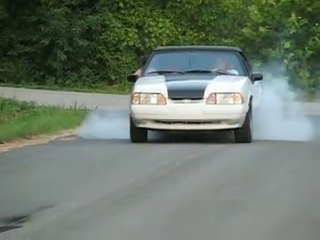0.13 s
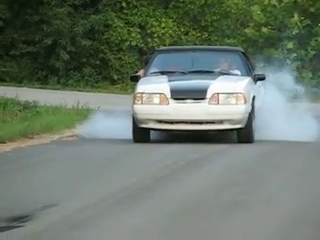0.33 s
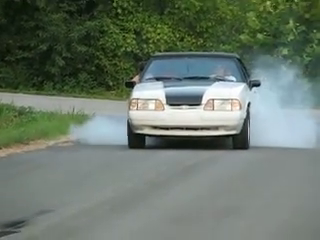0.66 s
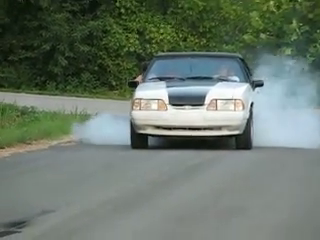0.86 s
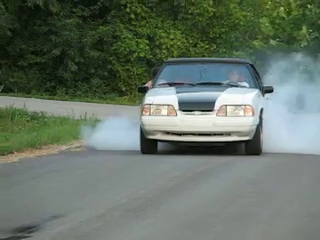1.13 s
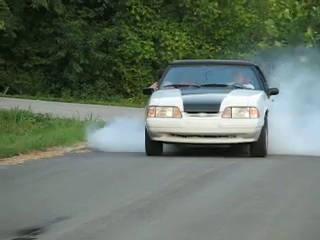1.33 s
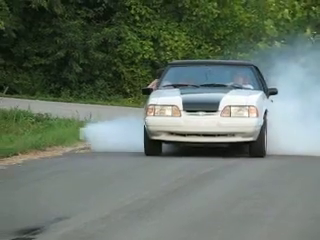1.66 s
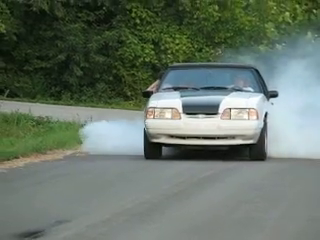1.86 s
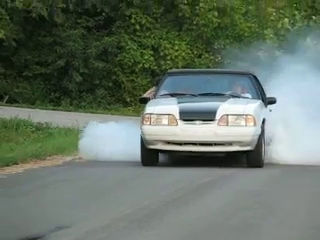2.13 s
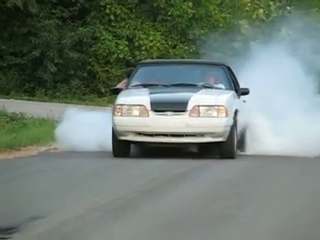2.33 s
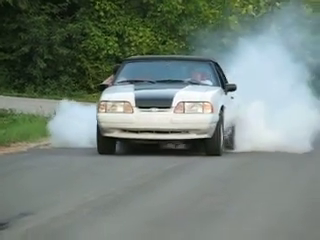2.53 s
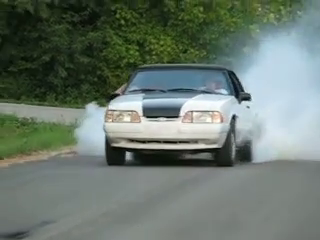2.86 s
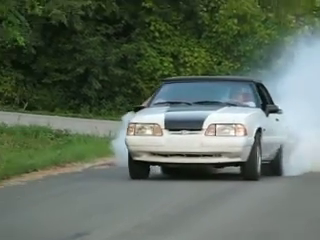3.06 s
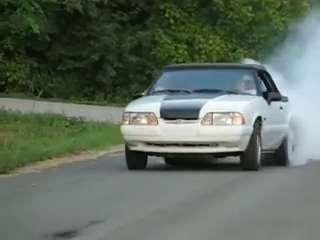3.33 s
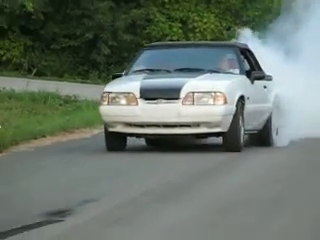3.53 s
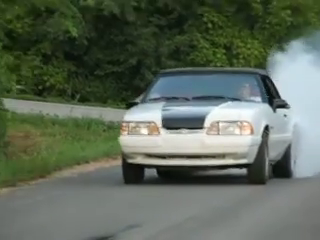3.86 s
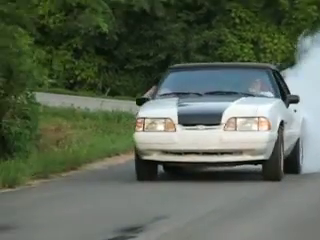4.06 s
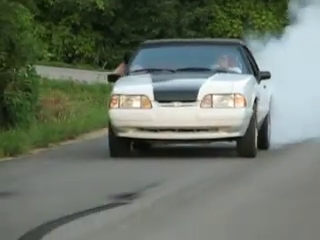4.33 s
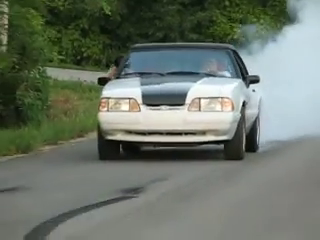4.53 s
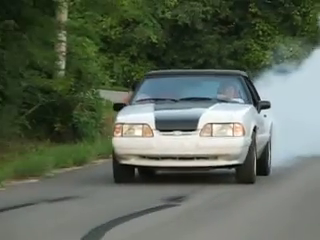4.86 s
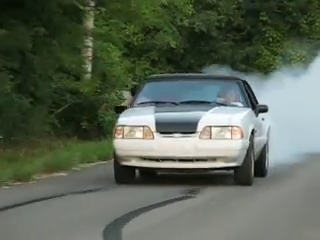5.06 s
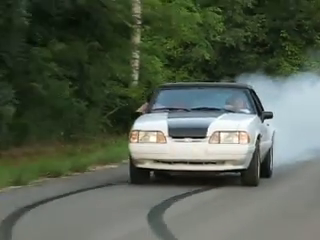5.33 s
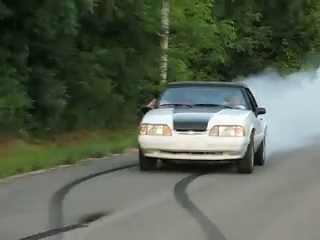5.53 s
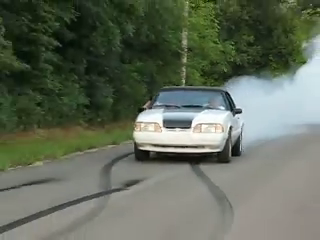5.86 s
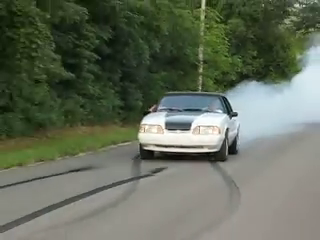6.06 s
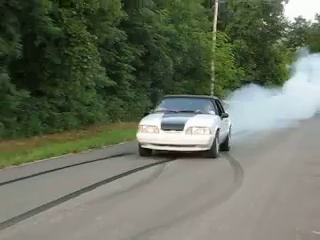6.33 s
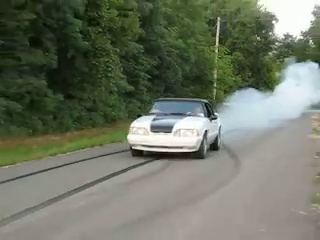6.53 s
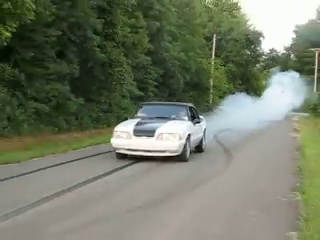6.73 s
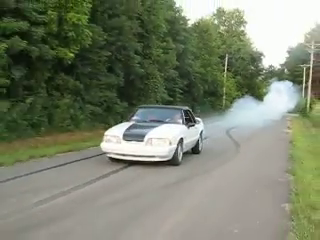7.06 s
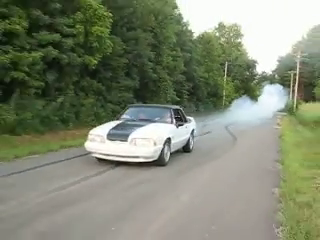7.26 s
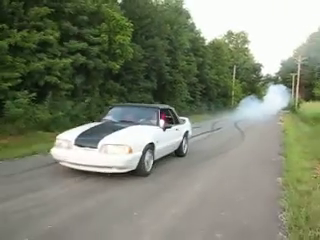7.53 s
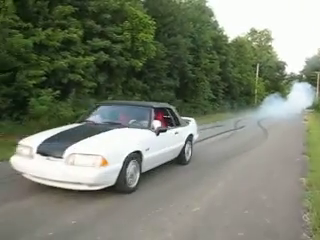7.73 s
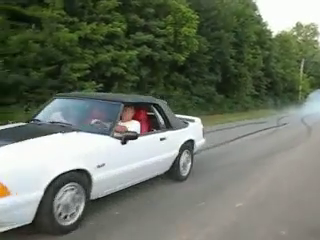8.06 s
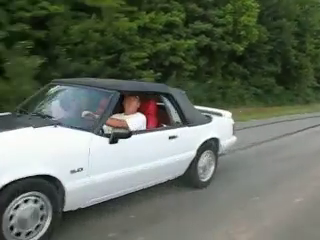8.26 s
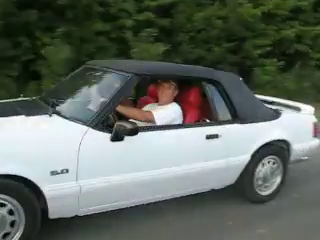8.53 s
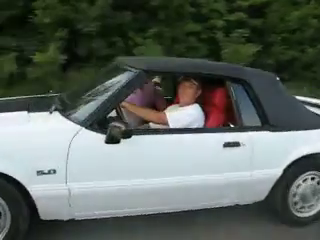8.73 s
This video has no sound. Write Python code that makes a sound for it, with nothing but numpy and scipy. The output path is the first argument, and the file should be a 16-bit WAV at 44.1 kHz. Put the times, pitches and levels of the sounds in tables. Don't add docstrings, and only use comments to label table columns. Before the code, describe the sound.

A V8 engine roars and whines over hissing, spinning tyres, rubber squeals as it grips, then exhaust booms and pops as the car coasts past.

```python
import sys
import numpy as np
from scipy import signal
from scipy.fft import rfft, irfft
from scipy.io import wavfile
from scipy.ndimage import uniform_filter1d

SR = 44100
rng = np.random.default_rng(int(sys.argv[2]) if len(sys.argv) > 2 else 0)


def store_wav(level_fs):
    pcm = np.round(np.clip(np.atleast_2d(level_fs), -1, 1) * 32767)
    wavfile.write(sys.argv[1], SR, pcm.T.astype(np.int16))


def volts(x):
    e = np.asarray(x, float) / 20
    return 10 ** e


N = 392490
COARSE = 8
REVS_HZ = 250
DUCT_HZ, DUCT_WIDTH_HZ = 168.7, 27


def rms_one(x):
    return x / np.sqrt(np.mean(np.abs(x) ** 2) + 1e-20)


def in_time(rows):
    s, *columns = np.transpose(rows)
    return [np.interp(np.arange(N) / SR, s, column) for column in columns]


def curve(rows):
    return in_time(rows)[0]


def at_hz(points, hz):
    table = np.array(points)
    return np.interp(np.log(hz), np.log(table[:, 0]), table[:, 1])


def drift(rate, at=None):
    r = np.exp(-80 * np.pi * rate / SR)
    chance = rng.standard_normal(N // 40 + 2002)
    slow = signal.lfilter([1], [1, -2 * r, r * r], chance)[2000:]
    at = np.arange(N) if at is None else at
    return np.interp(at / 40, np.arange(len(slow)), rms_one(slow))


def peak(hz, center_hz, width_hz):
    return 1 / (1 + ((hz - center_hz) / width_hz) ** 2)


def tone(cycles, order, wobble_db, slack):
    at = np.linspace(0, N, len(cycles))
    level = np.sqrt(2) * volts(wobble_db * drift(3.24, at))
    phase = 2 * np.pi * (order * cycles + rng.random()) + slack * drift(3.7, at)
    return level * np.sin(phase)


# (t/s, firing f/Hz, firing tone level/dB)
ENGINE_RUN = [(0, 198.4, -20.5), (.6, 233.5, -26), (1.2, 278.7, -24.5), (1.85, 313, -24), (2.3, 294.2, -24),
              (2.8, 265.8, -32), (3.8, 220.7, -44.5), (4.36, 178.6, -7.5), (4.55, 166.7, -10),
              (5.0, 178.7, -8.5), (5.4, 189.3, -12), (5.9, 187.1, -11), (6.42, 178, -13.5),
              (6.65, 162.2, -10.5), (7.2, 130.8, -19), (7.5, 114.7, -34), (8.4, 67.38, -31),
              (8.9, 51.9, -15)]


def engine_turning():
    firing_hz, firing_db = in_time(ENGINE_RUN)
    firing_hz = uniform_filter1d(firing_hz, int(.2 * SR), mode="nearest")
    return firing_hz, firing_db, np.cumsum(firing_hz) / 8 / SR


# (waves per engine cycle, level/dB under load, level/dB coasting)
UNEVEN_CYLINDERS = [(1, -5, -19), (1.95, 2, -5), (3, -5, 2), (3.78, -5.5, -13), (4.93, 1.5, -36),
                    (5.98, 6, 5), (6.503, -2.5, 5), (8.8, 5, -2), (9.8, 0, -13), (11, 5, 7), (11.9, 1, -8),
                    (13.08, 2.5, 0), (14.12, -3.5, -5), (14.72, -26, -3.5), (16, -4, 7), (18, -6.5, -29),
                    (17.87, -8.5, -16), (18.3, -29, -20), (19.9, -5.5, -21), (19.7, -21, -37),
                    (21.84, -10.5, -6), (22.8, -17, -30), (24, -9, -4), (24.96, -41, -17), (27.1, -19, -12),
                    (26.44, -10.5, -3.5), (28.2, -23, -17), (32.2, -16, 1.5)]
# (t/s, level/dB)
FIRING_OCTAVE = [(0, -46), (2.5, -34.5), (3.6, -68), (4.1, -49), (4.4, -25), (5.1, -32), (5.5, -37),
                 (7.8, -37.5), (8.3, -22.5), (8.9, -22.5)]
# (f/Hz, level/dB)
PIPE_TINT = [(30, -6.5), (150, 3.5), (300, 0), (450, -7.5), (550, -3.5), (700, 10), (900, 10.5),
             (1200, -13)]


def exhaust(cycles, firing_db, uneven_db, throttle):
    cycle_hz = np.gradient(cycles) * SR
    every = [cycles, cycle_hz, firing_db, curve(FIRING_OCTAVE), uneven_db, throttle]
    cycles, cycle_hz, firing_db, octave_db, uneven_db, throttle = np.array(every)[:, ::COARSE]
    out = volts(firing_db) * tone(cycles, 8, wobble_db=.9, slack=.2)
    out += volts(octave_db) * tone(cycles, 16, wobble_db=2.0, slack=.33)
    for order, load_db, coast_db in UNEVEN_CYLINDERS:
        order = round(order)
        if order == 16:
            continue
        hz = order * cycle_hz
        db = uneven_db + throttle * load_db + (1 - throttle) * coast_db
        db += throttle * (at_hz(PIPE_TINT, hz) + 6 * peak(hz, DUCT_HZ, DUCT_WIDTH_HZ))
        if order == 24:
            db -= 6 * (1 - throttle)
        out += volts(db) * tone(cycles, order, wobble_db=2.5, slack=.2)
    return signal.resample_poly(out, COARSE, 1)[:N]


# (t/s, open 0-1)
THROTTLE_OPEN = [
    (0, 1),
    (3.9, 1),
    (4.25, 0),
    (8.9, 0),
]
# (t/s, hiss level/dB)
HISS = [(0, -30), (.4, -27.5), (2.0, -27.5), (2.6, -27), (2.87, -33), (3.7, -37.5), (4.04, -34.5),
        (4.46, -34), (5.0, -34), (5.55, -28.5), (6.52, -28.5), (6.69, -31), (6.86, -28.5), (7.66, -28.5),
        (7.91, -27.5), (8.3, -28.5), (8.9, -28)]
# (multiple of the blade rate, level/dB)
FAN_TONES = [(1, -1), (2, -6.5), (3, -13), (4, -10), (5, -15.5), (7, -12.5), (10, -12.5)]
# (waves per engine cycle, level/dB over the hiss)
GEARED_WHINES = [(35.65, -15), (71.3, -13), (114.4, -16), (118.9, -16), (136.8, -12), (148.7, -14),
                 (159.7, -19), (202.2, -17)]
# (waves per engine cycle, from t/s, to t/s, level/dB)
PASSING_WHINES = [
    (58, 7.8, 8.45, -28.5),
    (71, 7.4, 8.0, -43),
    (136.8, 6.0, 6.45, -44),
]


def fan(cycles, fan_db):
    blade_order = 5.355
    throttle = curve(THROTTLE_OPEN)
    load, turns = throttle[::COARSE], cycles[::COARSE]
    blade_hz = blade_order * SR * np.gradient(cycles)[::COARSE]
    faded_db = -8 * (1 - load)
    duct_db = 3.0 * load * peak(blade_hz, DUCT_HZ, DUCT_WIDTH_HZ)
    blades = 0
    for k, tone_db in FAN_TONES:
        k_db = faded_db if k > 1.5 else duct_db
        cowl_db = 6.5 * load * peak(round(k) * blade_hz, 387, 9.1)
        blade = tone(turns, blade_order * round(k), wobble_db=3.0, slack=.32)
        blades = blades + volts(fan_db[::COARSE] + tone_db + k_db + cowl_db) * blade
    out = signal.resample_poly(blades, COARSE, 1)[:N]
    whines = sum(volts(db) * tone(cycles, order, 4.5, 1.3) for order, db in GEARED_WHINES)
    out += volts(curve(HISS) + 8 * throttle - 8) * whines
    s = np.arange(N) / SR
    for order, start, end, db in PASSING_WHINES:
        swell = np.sin(np.pi * np.clip((s - start) / (end - start), 0, 1))
        out += volts(db) * swell * tone(cycles, order, 2.5, 1.5)
    return out


# (t/s, spinning freely 0-1)
TYRE_SPIN = [
    (0, 1),
    (2.62, 0.55),
    (2.9, 0.67),
    (3.5, 0.09),
    (8.9, 0.02),
]
# (t/s, nose near 0-1, tailpipes near 0-1)
CAR_NEAR = [(0, 0.02, 0.09), (5.8, 0.02, 0), (6.1, 0.62, 0), (6.5, 0.73, 0), (6.75, 0.57, 0.22),
            (7.4, 0.57, 0.78), (7.9, 0.73, 0.76), (8.15, 0.86, 0.97), (8.35, 0.67, 0.87), (8.8, 0.5, 1),
            (8.9, 0.6, 0.93)]
# (t/s, level/dB)
SQUEAL_LEVEL = [
    (2.2, -92),
    (2.43, -37),
    (2.51, -24),
    (2.66, -19),
    (2.9, -15.5),
    (3.3, -16.5),
    (4.1, -20),
    (4.45, -35),
    (4.7, -90),
]


def noise_levels():
    hiss_db, load, spin = curve(HISS), curve(THROTTLE_OPEN), curve(TYRE_SPIN)
    nose, tail = in_time(CAR_NEAR)
    coast = 1 - load
    octaves = np.log2(curve(ENGINE_RUN) / REVS_HZ)
    rumble = load * (-15 + 8 * spin) + coast * (-11.5 + 21 * tail)
    roar = load * (-3.5 + spin * (11 + .5 * octaves)) + coast * (2 - 4.5 * tail + 2 * nose)
    rush = load * (-4 + 5 * octaves) + coast * (-14.5 + 8.5 * nose)
    scrub_db = curve(SQUEAL_LEVEL) - 28
    rush_db = 10 * np.log10(volts(hiss_db + rush) ** 2 + volts(scrub_db) ** 2)
    gust_db = 1.5 * drift(4.6)
    return hiss_db + rumble + gust_db, hiss_db + roar, rush_db, hiss_db


# (f/Hz, level/dB per Hz)
SPINNING_COLOUR = [(15, -46), (25, -7), (104, -24), (183, -10), (457, -21.5), (703, -15), (945, -18),
                   (1340, -10.5), (1530, -14.5), (2490, -17), (3930, -21.5), (6920, -16.5), (9820, -43),
                   (13600, -47), (15500, -51)]
# (f/Hz, level/dB per Hz)
ROLLING_COLOUR = [(15, -60), (25, 3.5), (80, -29), (169, -3.5), (221, -8), (314, -9), (523, -24),
                  (895, -18), (1110, -21), (1380, -20), (4880, -29.5), (6920, -24.5), (9560, -50),
                  (11500, -48), (15500, -59)]


def road_noise(cycles, throttle, levels):
    rumble_db, roar_db, rush_db, hiss_db = levels
    nose = in_time(CAR_NEAR)[0]
    levels_db = [
        rumble_db,
        roar_db - 3 - 7 * throttle,
        roar_db - 4.0,
        .72 * roar_db + .44 * rush_db + 3 * nose + .5,
        np.minimum(rush_db + 4.0, hiss_db + 10.0),
        hiss_db,
        1.228 * hiss_db - .3]
    edges = [20, 120, 450, 1100, 2300, 4500, 9000, 17000]
    hz, out = np.maximum(np.fft.rfftfreq(N, 1 / SR), 1), 0
    white = rfft(rng.standard_normal((2, N)))
    colours = [volts(at_hz(colour, hz)) for colour in (SPINNING_COLOUR, ROLLING_COLOUR)]
    for low, high, level_db in zip(edges, edges[1:], levels_db):
        band = white / np.sqrt((1 + (low / hz) ** 8) * (1 + (hz / high) ** 8))
        spin, coast = (rms_one(irfft(band * colour, N)) for colour in colours)
        level = volts(level_db + .72 * drift(14.0))
        out = out + level * (throttle * spin + (1 - throttle) * coast)
    return out * (1 + .088 * np.cos(16 * np.pi * cycles))


# (t/s, extra path/ms, strength 0-1)
ROAD_ECHO = [(0, 1.33, .1), (4.5, 1.33, .15), (5.9, 1.27, .35), (6.5, 1.25, .4), (7.3, 1.15, .35),
             (7.7, .9, .3), (8.0, .74, .4), (8.3, .66, .3), (8.9, .65, .1)]


def off_the_road(x):
    extra_ms, strength = in_time(ROAD_ECHO)
    dull = signal.sosfilt(signal.butter(4, 2500, fs=SR, output="sos"), x)
    return x + strength * np.interp(np.arange(N) - extra_ms * SR / 1000, np.arange(N), dull)


# (t/s, level/dB)
UPPER_NOTES = [(2.2, -9), (2.8, -7), (3.05, -2.5), (3.3, 1.5), (3.5, 1.5), (3.7, 0), (4.7, 0)]
# (pitch ratio at start, ratio at end, width f/Hz, early level/dB, late level/dB)
TREAD_PATCHES = [(1, 1, 30, 2, 1), (1, 1, 123, -9, 1), (.93, .9, 71, -19, -8.5), (.855, .95, 44, 4.5, -10),
                 (.76, .815, 29, -12, -5.5), (.78, .82, 120, -11, -4), (.64, .71, 70, -29, -18.5),
                 (1.26, 1.345, 60, -10, -19), (1.65, 1.77, 130, -4, -7), (1.69, 1.745, 55, -8, -8),
                 (1.5, 1.6, 170, -5, -9), (1.8, 2.0, 140, -9, -6.5), (2.25, 2.5, 120, -15, -17)]


def squeal():
    at = np.arange(int(SQUEAL_LEVEL[0][0] * SR), int(SQUEAL_LEVEL[-1][0] * SR))
    s = at / SR
    db, upper_db = curve(SQUEAL_LEVEL)[at], curve(UPPER_NOTES)[at]
    db = db - 12 * np.exp(-((s - 2.74) / .03) ** 2)
    pitch_hz = 1710 + (2061 - 1710) * np.exp(-np.maximum(s - 2.55, 0) / .7)
    late = np.clip((s - 2.6) / 1.0, 0, 1)
    waver = .007 + (.024 - .007) * (1 - late) ** 2
    locked = np.clip(1 - (s - 3.7) / .4, .25, 1)
    waiting_db = -300 * np.maximum(2.6 - s, 0)
    out = np.zeros((2, N))
    for start, end, width_hz, early_db, late_db in TREAD_PATCHES:
        note_hz = pitch_hz * (start + (end - start) * late) * (1 + waver * drift(16, at))
        note = np.exp(2j * np.pi * np.cumsum(note_hz) / SR)
        steady = np.exp(1.5j * drift(width_hz / 2, at)) * (width_hz < 50)
        slip = np.array([rms_one(drift(width_hz, at) + 1j * drift(width_hz, at) + 2.5 * locked * steady)
                         for row in range(2)])
        patch_db = db + early_db + (late_db - early_db) * late
        patch_db = patch_db + upper_db * (start > 1.1) + waiting_db * (start > .9)
        stutter_db = (.5 + 2.5 * (1 - late) ** 3) * drift(27, at)
        out[:, at] += volts(patch_db + stutter_db) * (slip * note).real
    return volts(.35 * drift(13.0)) * out


def resonance(x, hz, width_hz):
    r = np.exp(-np.pi * width_hz / SR)
    poles = [1, -2 * r * np.cos(2 * np.pi * hz / SR), r * r]
    return signal.lfilter(np.array([1, 0, -1]) * (1 - r * r) / 2, poles, x)


def evened(x, share, window_s):
    level = np.sqrt(uniform_filter1d(x ** 2, int(window_s * SR)) + 1e-12)
    return rms_one(x / level ** share)


def swells(rows, rise_db_per_s, fall_db_per_s):
    s, out = np.arange(N) / SR, np.full(N, -99.)
    for start, held, db in rows:
        rising = rise_db_per_s * np.maximum(start - s, 0)
        falling = fall_db_per_s * np.maximum(s - start - held, 0)
        out = np.maximum(out, db - rising - falling)
    return out


# (f/Hz, width f/Hz, level/dB)
PIPE_RINGS = [(292.5, 31, 2.5), (330, 23.5, -1.5), (258, 22, -6.5), (398, 59, -4.5), (450, 150, -9.5),
              (895, 150, -14.5)]
# (t/s, level/dB)
BACKFIRE_POPS = [
    (7.46, -24.5),
    (7.69, -23),
    (7.88, -18.5),
    (8.3, -20.5),
    (8.63, -24),
    (8.77, -23.5),
]
# (t/s, held/s, level/dB)
BOOM_SURGES = [(6.9, 0.13, -15), (7.1, 0.034, -15), (7.26, 0.12, -15), (7.46, 0.11, -12),
               (7.67, 0.018, -33), (7.81, 0.0096, -17.5), (7.9, .16, -17), (8.16, 0.1, -16.5),
               (8.39, 0.052, -24), (8.56, 0.065, -22), (8.72, 0.051, -25), (8.86, .03, -19.5)]


def burble():
    pops = (rng.random(N) < 400 / SR) * rng.standard_normal(N) + .03 * rng.standard_normal(N)
    rings = 0
    for hz, width_hz, db in PIPE_RINGS:
        ring = resonance(resonance(pops, hz, width_hz), hz, 2 * width_hz)
        rings = rings + volts(db) * rms_one(ring)
    boom = resonance(resonance(pops, 159, 8), 159, 1.8 * 8)
    s = np.arange(N) / SR
    backfire_db = swells([(at, 0, db) for at, db in BACKFIRE_POPS], 66, 44)
    burble_db = np.maximum(-30 + 9.5 * in_time(CAR_NEAR)[1], backfire_db)
    surge_db = np.maximum(-41, swells(BOOM_SURGES, 243, 244))
    rings = volts(burble_db - .5) * evened(rings, share=.26, window_s=.055)
    boom = volts(surge_db) * evened(boom, share=.75, window_s=.031)
    return np.clip((s - 6.0) / .9, 0, 1) * rings + np.clip((s - 6.85) / .32, 0, 1) * boom


# (f/Hz, likeness 0-1)
PORT_LIKENESS = [(40, .985), (100, .996), (380, .999), (1200, .98), (2000, .92), (3000, .76), (4300, .68),
                 (5600, .46), (7500, .52), (9500, .5), (12000, .3), (15000, .3)]
# (f/Hz, level/dB)
PORT_LEAN = [(60, .3), (1200, 0), (1900, -3), (2600, -8), (3300, -3.5), (4000, 2), (4800, 3.5), (6000, 2),
             (7200, -1), (8500, -3), (9800, 0), (11000, 7), (12500, 2), (15000, 0)]
# (f/Hz, lead/radians)
PORT_LEAD = [(0, -.09), (400, -.07), (1200, -.15), (2200, -.6), (2600, .1), (3200, .9), (3900, 1.0),
             (5000, .6), (6000, 1.1), (7700, 1.0), (9500, 1.0), (10300, 1.6), (12000, 1.6), (15000, 1.2)]


def ports(source, other):
    hz = np.maximum(np.fft.rfftfreq(N, 1 / SR), 1)
    alike = np.clip(at_hz(PORT_LIKENESS, hz), 0, 1)
    mid = rfft(source) * np.sqrt((1 + alike) / 2)
    side = rfft(other) * np.sqrt((1 - alike) / 2)
    lead = np.interp(hz, *np.transpose(PORT_LEAD))
    lean = volts(at_hz(PORT_LEAN, hz) / 2) * np.exp(.5j * lead)
    return irfft(np.array([(mid + side) * lean, (mid - side) / lean]), N)


def scene():
    firing_hz, firing_db, cycles = engine_turning()
    throttle, hiss_db = curve(THROTTLE_OPEN), curve(HISS)
    nose, tail = in_time(CAR_NEAR)
    muffle_db = -4 * throttle * (1 - curve(TYRE_SPIN))
    lope_db = 1.5 * drift(3.2)
    uneven_db = hiss_db - 9.5 * throttle - 12.5 * (1 - throttle) + lope_db + muffle_db
    fan_db = hiss_db - 1 + 13 * np.log2(firing_hz / REVS_HZ) + 7.5 * nose + 15 * tail + muffle_db
    tones = exhaust(cycles, firing_db, uneven_db, throttle) + fan(cycles, fan_db) + burble()
    road_direct, road_scattered = road_noise(cycles, throttle, noise_levels())
    squeal_direct, squeal_scattered = squeal()
    direct = tones + squeal_direct + off_the_road(road_direct)
    scattered = volts(-5.5) * squeal_scattered + off_the_road(road_scattered)
    return ports(direct, scattered)


def roll_off(x):
    return signal.sosfilt(signal.butter(12, 15660, fs=SR, output="sos"), x)


def record(dry):
    thin = signal.sosfilt(signal.butter(2, 50, "high", fs=SR, output="sos"), dry)
    mix = 1.054 * np.tanh(thin / 1.16)
    return roll_off(mix)


dry = scene()
out = record(dry)
store_wav(out)
```